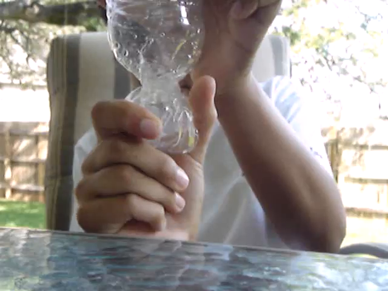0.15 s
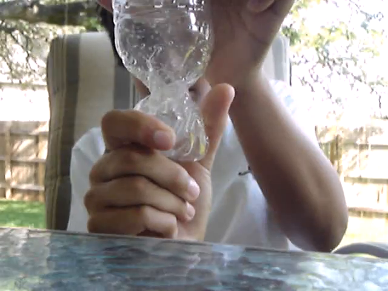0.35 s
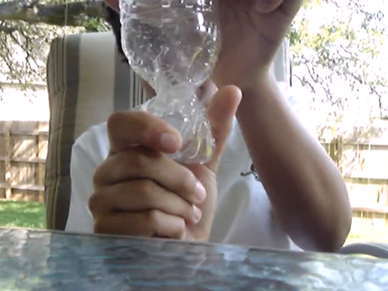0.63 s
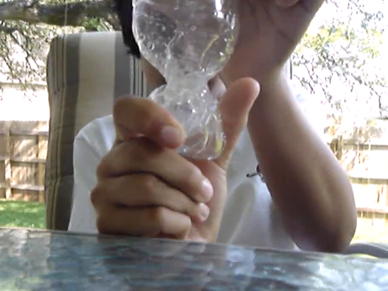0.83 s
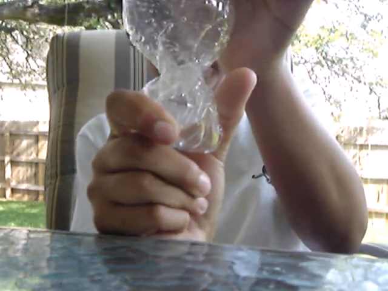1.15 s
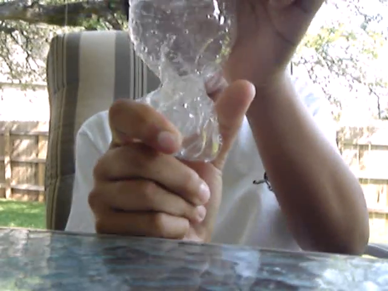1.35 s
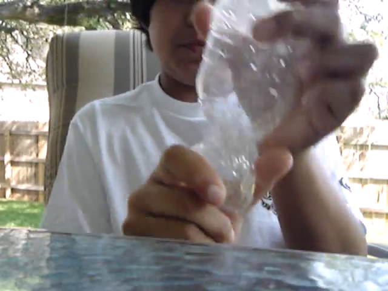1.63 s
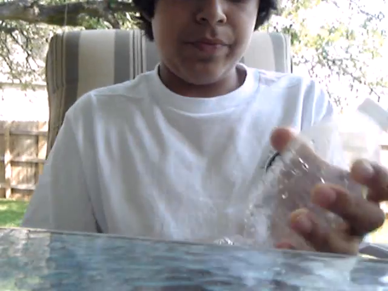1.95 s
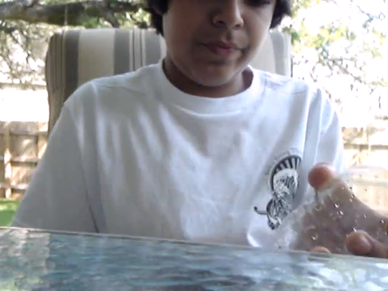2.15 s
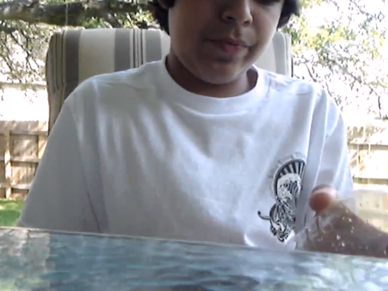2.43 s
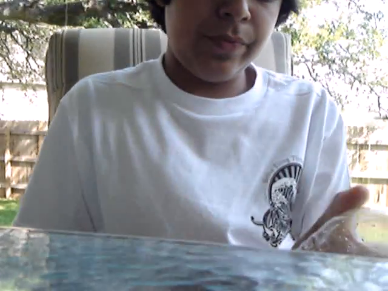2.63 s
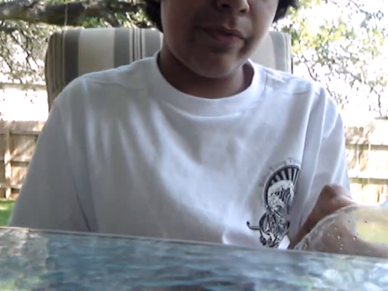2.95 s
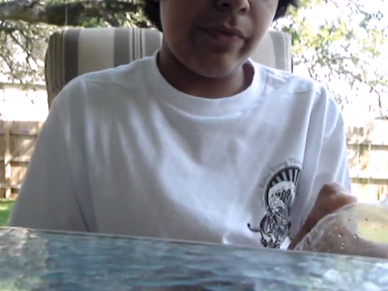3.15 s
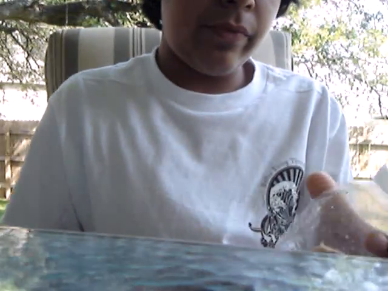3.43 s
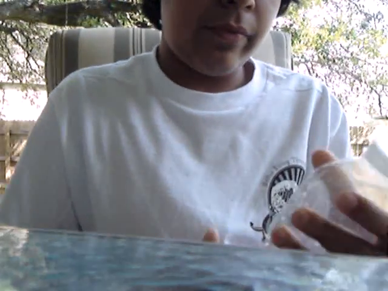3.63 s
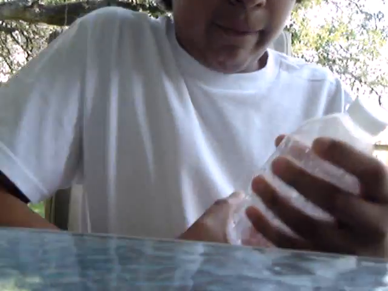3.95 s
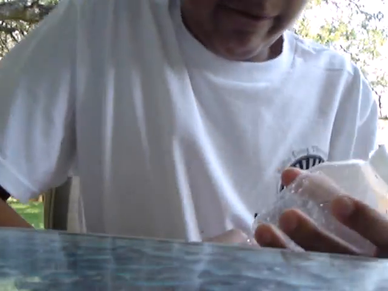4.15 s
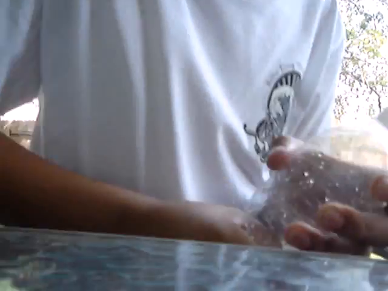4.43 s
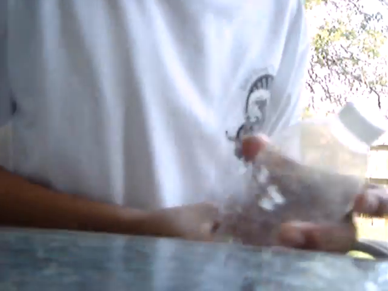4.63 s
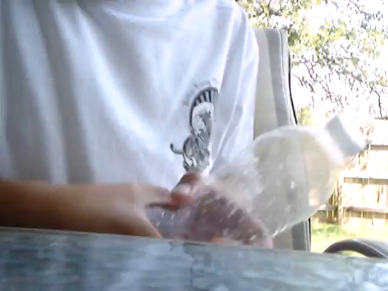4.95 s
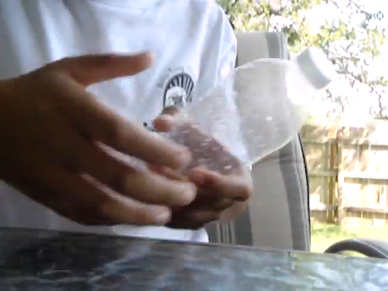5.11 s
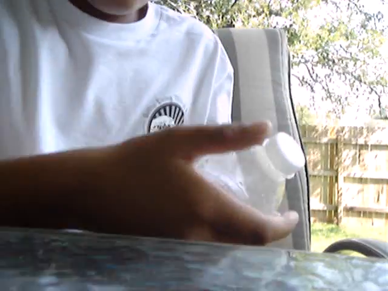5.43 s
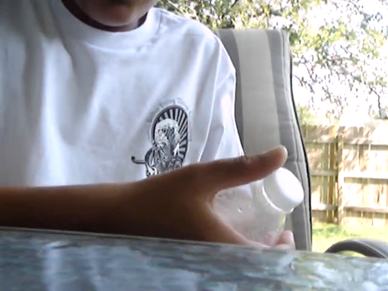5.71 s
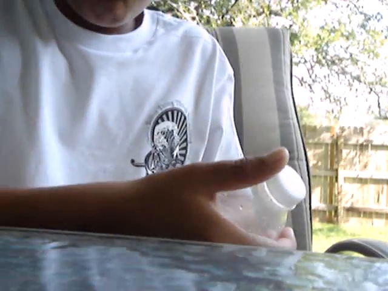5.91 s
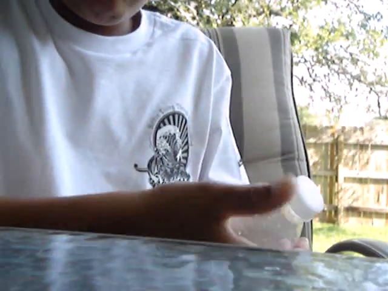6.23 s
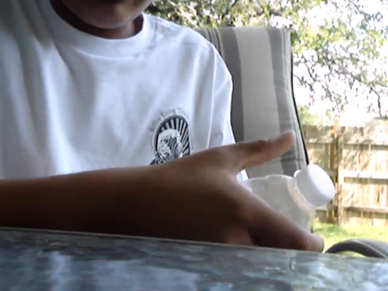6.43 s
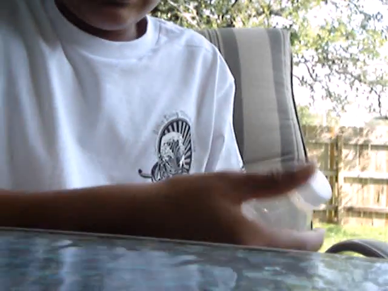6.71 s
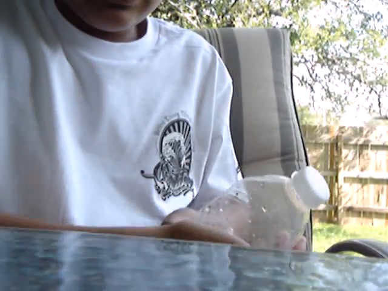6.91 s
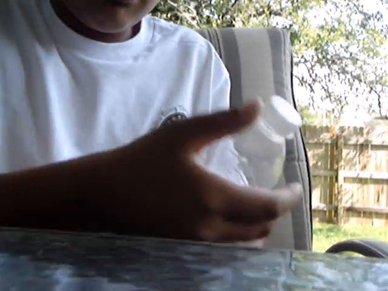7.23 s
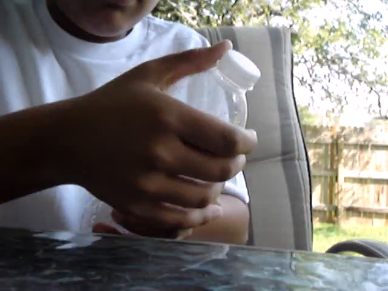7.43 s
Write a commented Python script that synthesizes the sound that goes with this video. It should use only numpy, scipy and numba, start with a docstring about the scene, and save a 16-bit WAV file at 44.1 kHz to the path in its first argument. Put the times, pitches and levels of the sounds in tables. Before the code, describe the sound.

A thin empty plastic bottle is twisted and crackles, creaks and squeaks in uneven bursts, then hands bump and thud over a fluttering outdoor drone.

```python
"""At a garden table outdoors, close to a small microphone, a thin empty plastic bottle is wrung and let unwind.
Folds in its wall snap singly and in flurries: noise cracks ringing through panel resonances.
Each turn of the wrist creaks, a stick-slip run of pulses through two panels that bend in pitch.
The hands bump and rumble: short swelling tones and patchy low noise.
Further back are outdoor air and a machine-like flutter, resonant noise beating about 22 times a second."""
import sys
import numpy as np
from scipy import signal
from scipy.fft import rfft, irfft
from scipy.io import wavfile
from scipy.ndimage import uniform_filter1d
from numba import njit

SR = 44100
rng = np.random.default_rng(int(sys.argv[2]) if len(sys.argv) > 2 else 0)


def wav_out(sig):
    """Save sig, one row per channel (or a flat mono array), as 16-bit PCM at SR to the path in sys.argv[1]."""
    wavfile.write(sys.argv[1], SR, np.round(np.clip(np.atleast_2d(sig).T, -1, 1) * 32767).astype(np.int16))


N = 333820
T = np.arange(N) / SR  # time of every sample in seconds

# Single snaps of folds, loud and faint, and the last separate ticks of a creak slowing down near 2.9 s;
# all before the patio's tail.
# Each row: time in seconds, level in dB (energy spread over about 4 ms), nominal pitch in Hz.
SNAPS = [(0.1463, -26.5, 6000), (0.1722, -31, 3480), (0.2211, -26.5, 3360), (0.2366, -26.5, 3570),
         (0.2899, -22.5, 4500), (0.303, -26, 1710), (0.353, -27, 4500), (0.3703, -26, 1670),
         (0.375, -33.5, 4500), (.385, -38.5, 2600), (0.4, -23, 3440), (0.4054, -26.5, 2080),
         (0.4245, -23, 2960), (0.4505, -20, 4500), (0.452, -13.5, 4470), (0.494, -33, 3360),
         (0.5078, -22.5, 3500), (.7863, -28, 5650), (0.7936, -27.5, 3800), (0.803, -31.5, 4700),
         (0.8112, -18, 2860), (0.8235, -30.5, 4300), (0.832, -23.5, 3080), (0.8368, -29, 3300),
         (.849, -26.5, 3700), (0.867, -26.5, 3110), (0.9343, -27, 2000), (0.959, -31, 4460),
         (1.26, -32.5, 2650), (1.284, -22.5, 5160), (1.293, -42, 3200), (1.311, -22, 1920),
         (1.315, -23.5, 3520), (1.3194, -24, 5820), (1.3305, -36.5, 3600), (1.3446, -22, 3670),
         (1.3504, -25.5, 5000), (1.357, -27, 6480), (1.389, -26.5, 2950), (1.403, -16, 2686),
         (1.4199, -30, 3520), (1.432, -39, 2500), (1.4411, -49.5, 3600), (1.4505, -26, 3600),
         (1.457, -25.5, 6200), (1.4616, -25.5, 3346), (1.4751, -24, 3140), (1.6563, -19, 2836),
         (1.6762, -24.5, 2900), (1.69, -22.5, 2650), (1.7, -21.5, 2974), (1.7066, -30.5, 3200),
         (1.7126, -27, 3280), (1.7177, -33, 3500), (1.7249, -27, 2380), (1.7322, -31.5, 3270),
         (1.7397, -23, 3100), (1.7456, -26, 3300), (1.753, -28.5, 2900), (1.7654, -28.5, 2580),
         (1.7767, -29, 2196), (1.7843, -34.5, 1800), (1.797, -33, 1490), (1.8034, -20, 2610),
         (1.8085, -29.5, 2900), (2.1189, -23.5, 2258), (2.1283, -30, 2796), (2.254, -18, 2997),
         (2.2669, -25.5, 3775), (2.281, -28.5, 4500), (2.5476, -29.5, 2396), (2.594, -35, 5531),
         (2.8605, -34.5, 5400), (2.8812, -33, 5397), (2.8973, -31.5, 5403), (2.9064, -29, 5403),
         (2.9178, -27.5, 5310), (2.9304, -29, 5200), (2.946, -25, 5092), (2.9633, -28, 5060),
         (3.029, -24, 3990), (3.1014, -27, 3823), (3.1173, -30, 4500), (3.136, -26.5, 4321),
         (3.153, -27, 4819), (3.158, -15.5, 3370), (3.193, -29.5, 4206), (3.3389, -28, 3830),
         (3.4337, -18, 2200), (3.451, -21, 3600), (3.49, -18.5, 1100), (3.5049, -18.5, 1520),
         (3.5084, -11.5, 3096), (3.5106, -16, 2599), (3.521, -16, 3020), (3.529, -29.5, 3500),
         (3.735, -41.5, 3410), (3.912, -41, 7533), (3.977, -18.5, 1960), (4.3742, -15, 3492),
         (4.3977, -22.5, 1835), (4.4248, -8, 1956), (4.4438, -15.5, 4693), (4.48, -23, 3190),
         (4.5155, -30, 2192), (4.5321, -12, 2760), (4.5469, -18, 3545), (4.612, -33, 2223),
         (4.6997, -32, 2007), (4.701, -18, 994), (4.7075, -16, 3600), (4.7218, -19.5, 4514),
         (4.725, -16, 3908), (4.7571, -10, 1104), (4.7616, -13, 2938), (4.768, -25.5, 1298),
         (4.9387, -25.5, 1600), (5.354, -31.5, 2200), (7.339, -41, 5416)]
# Flurries, quick runs of further snaps.
# Each row: start in seconds, end in seconds, typical level in dB, typical nominal pitch in Hz.
FLURRIES = [(0.462, 0.502, -27, 3600), (0.814, 0.89, -37, 2600), (1.411, 1.491, -32.5, 2810),
            (1.703, 1.753, -44, 4020), (1.764, 1.815, -26.5, 2000), (2.107, 2.24, -29.5, 2220),
            (3.44, 3.482, -30, 3600), (4.46, 4.59, -26, 3280), (4.66, 4.70, -30.5, 3400),
            (4.735, 4.80, -24.5, 3200)]
FOLDS_PER_S, FOLD_SPREAD_DB, FOLD_SPREAD_OCTAVES = 86, 1.5, 0.6
# Colour of a snapping wall. Each row: frequency in Hz, gain in dB.
WALL_COLOUR = [(150, -25.5), (450, -8), (800, 1), (1250, -2.5), (1800, 2), (2900, -5.5), (3500, -2.5),
               (4100, -4), (4700, -1), (6100, -2.5), (7000, -0.5), (10000, 3.5)]
FLIP_SAMPLE = 88  # where the sharp push falls within a crack
# A hard snap kicks the whole shell: its pitch, ring time, and share of a snap at the level SHELL_AT_DB.
SHELL_HZ, SHELL_RING_S, SHELL_DB, SHELL_AT_DB = 1997, 0.000263, -3, -10.5

# Turns of the wrist; each grip leaves a large and a small panel free to ring.
# Each row: start, hardest moment and end in seconds, swell in dB from the ends to the hardest moment,
# nominal slips per second in Hz at the start, at the hardest and at the end, body level in dB, treble level in dB
# (both at the hardest), large panel in Hz, its gain in dB, small panel in Hz, its gain in dB.
TWISTS = [(0.462, 0.486, 0.57, 8.2, 200, 500.5, 300.3, -47.5, -36, 2460, 5, 4450, -23),
          (0.782, 0.833, 0.876, 9.8, 128.5, 295.9, 128.3, -36, -49, 2300, -7.5, 3680, 20.5),
          (1.001, 1.1, 1.22, 6.8, 400, 501.4, 401.1, -62.5, -52, 2190, -0.5, 7530, 7.5),
          (1.305, 1.448, 1.53, 4.9, 100.1, 248.4, 99.97, -36, -62.5, 1614, 22.5, 3400, 5.5),
          (1.696, 1.744, 1.85, 10, 300.2, 401.2, 200.2, -28, -44, 1743, 13, 4320, 0),
          (1.979, 2.025, 2.104, 13.16, 352, 299.9, 90.7, -31, -27.5, 1972, 5, 7990, 5),
          (2.1, 2.128, 2.36, 13.37, 220.3, 321.2, 448.3, -31.5, -27, 2176, -1.5, 7600, 2.5),
          (2.348, 2.439, 2.6, 5.67, 396.9, 548.8, 445.5, -42.5, -48.5, 1239, 14, 6009, -1),
          (2.57, 2.833, 2.84, 13.48, 480, 219.4, 199.9, -33.5, -28.5, 2243, 4, 6580, 4),
          (2.834, 2.842, 2.88, 6.6, 190, 170, 99.92, -30.5, -28.5, 2244, 6, 6300, 8),
          (2.974, 3.051, 3.155, 3.1, 80.17, 109.8, 79.83, -47.5, -51, 2145, 1.5, 6107, 12.5),
          (3.165, 3.289, 3.31, 1.954, 129.9, 230.3, 270.7, -33, -26.5, 2174, -5.5, 6092, 2),
          (3.307, 3.331, 3.337, 2.173, 280, 480.5, 602.5, -30.5, -21.5, 2217, -5, 4973, -9.5),
          (3.337, 3.38, 3.385, 3.4, 1049, 1496, 1479, -25, -16, 2824, -4.5, 5003, -13),
          (3.385, 3.452, 3.495, 2.9, 351.3, 478.4, 344.9, -29.5, -24.5, 2310, 0, 4000, -28),
          (3.515, 3.528, 3.64, 23.27, 500, 759, 301.1, -20.5, -21.5, 1588, -15, 4340, -2),
          (3.982, 3.986, 4.018, 6.7, 302, 500, 298.7, -33.5, -56.5, 2387, 7.5, 2980, 11),
          (4.436, 4.479, 4.625, 5.9, 603, 751.3, 552.2, -29, -30, 2510, -5.5, 5202, -12),
          (4.592, 4.599, 4.7, 3.9, 500, 450.5, 399.4, -50.5, -44.5, 2400, 3.5, 7980, 17),
          (4.633, 4.75, 4.86, 6.8, 400, 645.4, 400.6, -32, -32.5, 1901, -18, 5521, 0),
          (4.871, 4.9, 4.997, 7, 249.7, 482, 250.2, -35, -37.5, 1947, 7.5, 8410, 11),
          (6.009, 6.059, 6.12, 8.4, 300, 453.3, 296.6, -50.5, -46, 2183, 1, 6760, 0.5),
          (6.797, 6.837, 6.87, 18.6, 150, 600, 151.8, -39, -37, 1489, -13.5, 6550, 0)]
# Colour of the rubbing contact. Each row: frequency in Hz, gain in dB.
RUB_COLOUR = [(300, -24), (850, -7), (1300, 6), (2200, 3), (2900, 1), (3600, 1), (4300, 1), (5800, 0),
              (7000, -4.5), (10000, -6)]
SLIP_JITTER_DB, SLIP_RING_S = 1.3, .002  # jitter of the slip rate at its loosest; ring time of one slip
BEND_DB_PER_DB = 0.2728  # panels rise in pitch as the force of a turn grows

# Handling bumps, heavy and light, before the microphone's low cut.
# Each row: start in seconds, peak of the swell in dB, pitch in Hz.
BUMPS = [(1.925, -26.5, 178), (2.358, -13, 253.1), (2.405, -16.5, 268.9), (2.573, -11.5, 200),
         (3.508, -23, 451), (3.727, -16, 322), (3.736, -10.5, 253), (4.195, -23.5, 171.3),
         (4.261, -20, 266), (4.397, -9.5, 253.4), (4.405, -13, 280.8), (4.478, -23, 229),
         (4.711, -14.5, 560), (4.757, -20, 549.8), (4.844, -12, 295.9), (4.937, -10.5, 253.8),
         (4.948, -7.5, 298.6), (4.956, -11, 400), (4.964, -8, 260), (4.971, -8, 270), (4.985, -6.5, 296.1),
         (5.096, -9, 326.6), (5.139, -16.5, 401), (5.161, -6.5, 321), (5.173, -12.5, 470),
         (5.189, -4.5, 386), (5.263, -6.5, 268), (5.274, -11.5, 324), (5.311, -12.5, 300),
         (5.319, -8.5, 433), (5.353, -10, 301), (5.358, -8, 293), (5.373, -3.5, 314), (5.383, -6, 403),
         (5.46, -11.5, 376), (5.656, -15.5, 242), (5.674, -14.5, 364), (6.161, -14, 260)]
# Moves of the hands and arms, before the low cut.
# Each row: peak time in seconds, time to die down by 1 / e in seconds, level at the peak in dB.
HANDS = [(1.82, 0.071, -29), (1.935, 0.02575, -41), (2.39, 0.068, -28.5), (2.5, 0.041, -31.5),
         (2.95, 0.1085, -37.5), (3.75, 0.0664, -29.5), (3.87, 0.0367, -34), (4.197, 0.019, -30),
         (4.29, 0.0403, -27), (4.41, 0.0504, -31), (4.72, 0.0826, -33), (4.95, 0.0958, -28),
         (5.35, 0.1926, -28.5), (5.72, 0.254, -32.5), (6.18, 0.098, -38.5), (7.269, 0.09, -43.5)]
HAND_RISE_SHARE = 0.965  # a move builds a little faster than it dies down
# Colour of the hands' rumble. Each row: frequency in Hz, gain in dB.
RUMBLE_COLOUR = [(30, -38.5), (70, -22.5), (130, -4), (210, 0), (350, -8.0), (550, -25.5), (900, -28.0), (3000, -57)]
# The bumps set the table shuddering. Each row: frequency in Hz, gain in dB.
SHUDDER_COLOUR = [(25, -18), (100, -17.5), (220, -4.5), (380, -0.5), (560, -0.5), (750, -23.5),
                  (1100, -36.5), (3000, -70.5)]
SHUDDER_DB, SHUDDER_S = -16, 0.0087  # level under the peak of a bump; time to swell and to die down by 1 / e

# Course of the flutter; fixed mixing gains follow in flutter().
# Each row: time in seconds, reference level in dB, hollow drone in dB over that reference.
FLUTTER = [(0, -37, 1.5), (.5, -35.5, 1.5), (1.6, -34, 1.5), (1.75, -48.5, 7.5), (2.0, -39.5, -1.5),
           (2.4, -32.5, -5.5), (3.1, -30.5, -1), (3.6, -31, -8), (3.95, -36, -6.5), (4.3, -38, -5.5),
           (4.8, -32, 2.5), (5.2, -28, -4.5), (5.7, -30.5, -0.5), (6.4, -33, 3.5), (6.52, -39, -7.5),
           (7.2, -41.5, -2.5), (7.4, -34.5, -3), (7.57, -30.5, 0)]
# Pace of the flutter. Each row: time in seconds, beats per second in Hz.
PACE = [(0, 22.15), (1, 21.95), (2, 21.9), (2.6, 22.45), (3.6, 21.85), (4.8, 21.73), (5.4, 22.25),
        (6.3, 22), (7.57, 21.9)]
# Hollow resonances of the drone. Each row: centre in Hz, width of the first filter in Hz, gain in dB.
HOLLOW = [(244.08, 4.4, 1), (372.85, 19.05, 5.5), (436.57, 8, 5), (474.3, 52, -3.5), (560, 62.5, -1)]
# Colour of the rasp. Each row: frequency in Hz, gain in dB.
RASP_COLOUR = [(400, -14), (750, -1.5), (950, -4.5), (1250, 1), (1700, -1.5), (2300, -3), (3000, -5.5),
               (4300, -9.5), (5400, -15.5), (7000, -25.5), (10000, -39)]
# Resonances of the rasp. Each row: centre in Hz, width in Hz, typical gain in dB.
RASP_MODES = [(1128.4, 19.3, 8), (1259, 27.9, 2), (1386, 61, -9), (1705, 55, -5.5), (2080, 74, -4),
              (2300, 20, 1.5), (2528, 120, -7), (3600, 43, -20), (4500, 160, -6.5)]
# Colour of the low noise under the drone. Each row: frequency in Hz, gain in dB.
UNDER_COLOUR = [(40, -39.5), (100, -0.5), (170, -4.5), (300, 3.0), (600, 0.5), (900, -11.0), (3000, -42.0)]
BEAT_DEPTH_DB, BEAT_AT_DB = 6.5, -30.5  # typical stroke over the rasp when the reference level is BEAT_AT_DB
STROKE_AT_TURN, SECOND_STROKE_S, SECOND_STROKE_DB = .76, .0095, -3
STROKE_RISE_S, STROKE_FALL_S = 0.0014, 0.00793

# Colour of the outdoor air. Each row: frequency in Hz, gain in dB.
AIR_COLOUR = [(15, -53.5), (25, -25), (118, -13.5), (148, -9.5), (257, -14.5), (307, -13), (414, -23.5),
              (447, -7.5), (719, -6.5), (775, -8.5), (857, -6), (1280, -14.5), (4600, -31), (10000, -32.5),
              (13000, -64.5), (22000, -120)]
AIR_DB = -41.5

TOP_HZ, CEILING, CLIP_TOP_HZ = 9950, .72, 15800  # microphone's top, clipping level, top after clipping
# How much of the clipping's spit gets through. Each row: frequency in Hz, gain in dB.
SPIT_COLOUR = [(9900, 0), (10600, -8)]


def snaps(max_folds=20):
    """Folds snap one by one, loud and faint; flurries are quick runs at uneven gaps, varied in strength and pitch."""
    out = np.zeros(N)
    for s, db, hz in SNAPS:
        add(out, s - FLIP_SAMPLE / SR, fold(hz, db))
    for start, end, db, hz in FLURRIES:
        for k in range(max_folds):
            s = start + (k + rng.random()) / FOLDS_PER_S
            strength, pitch = rng.standard_normal(2)
            sound = fold(hz * 2 ** (FOLD_SPREAD_OCTAVES * pitch), db + FOLD_SPREAD_DB * strength)
            if s < end:
                add(out, s, sound)
    return out


def fold(hz, db, level_samples=190):
    """One fold cracks abruptly at its own pitch: large panels low and dull, tight creases high."""
    flip = colour(crack(ring=1.5, ring_s=.0017, give_s=.0004), WALL_COLOUR)
    sound = band(flip, 0.981 * hz, 1.0 * hz)
    # the freed panel sings briefly, with an inharmonic upper mode
    upper_hz = hz * rng.uniform(1.25, 2.923)
    sound = sound + undb(-4) * band(flip, 0.704 * hz, 240)
    sound = sound + undb(-5.5) * band(flip, upper_hz, 990)
    sound = signal.lfilter(*signal.butter(2, min(1.825 * hz, SR / 3), fs=SR), sound)
    # the harder the snap, the more the whole shell joins in
    t = np.maximum(np.arange(len(sound)) - FLIP_SAMPLE, 0) / SR
    shell_hz = SHELL_HZ * undb(.8 * rng.standard_normal())
    shell = np.sin(2 * np.pi * shell_hz * t) * t * np.exp(-t / SHELL_RING_S)
    shell_db = SHELL_DB + 1.09 * (db - SHELL_AT_DB)
    sound = unit(sound) + undb(shell_db) * unit(shell)
    return undb(db) * sound / np.sqrt(np.sum(sound ** 2) / level_samples)


def crack(ring, ring_s, give_s, count=700):
    """The wall gives way, flips with one sharp push at FLIP_SAMPLE, and rings out as decaying noise."""
    t = (np.arange(count) - FLIP_SAMPLE) / SR
    tail = rng.standard_normal(count) * np.exp(-np.abs(t) / np.where(t < 0, give_s, ring_s))
    return (t == 0) + ring * tail / np.linalg.norm(tail)


def creak(order=3):
    """The slips ring the panels that each grip leaves free; the sound swells and fades with the force of the turn."""
    rub = colour(slipping(slip_rate()), RUB_COLOUR)
    # the travelling crease has a restless resonance of its own
    rub = rub + undb(-5) * sweep(rub, 3000 * undb(1.44 * walk(40)), 1400.0)
    tension = undb(0.22 * walk(18))  # changing tension bends the panels' pitch
    low, high = (signal.butter(order, 3800, kind, fs=SR, output="sos") for kind in ("low", "high"))
    out = np.zeros(N)
    for (start, hardest, end, swell_db, _, _, _, body_db, treble_db,
         large_hz, large_db, small_hz, small_db) in TWISTS:
        # each end fades over 3.8 ms
        grip = np.clip(np.minimum(T - start, end - T) / 0.0038 + .5, 0, 1)
        on = grip > 0
        push = force(start, hardest, end, swell_db)[on]
        x = rub[on]
        bend = tension[on] * push ** BEND_DB_PER_DB
        x = x + undb(large_db) * sweep(x, large_hz * bend, 130.0) + undb(small_db) * sweep(x, small_hz * bend, 880.0)
        body = unit(signal.sosfilt(low, x))
        treble = unit(signal.sosfilt(high, x))
        out[on] += np.sqrt(grip[on]) * push * (undb(body_db) * body + undb(treble_db) * treble)
    return out


def slip_rate():
    """Through each turn the slips speed up or run down with the wrist: separate ticks when slow, a squeak when fast."""
    slip_hz = np.full(N, 100.)
    for start, hardest, end, _, start_hz, hardest_hz, end_hz, *_ in TWISTS:
        on = (T > start) & (T < end)
        times = [start, np.clip(hardest, start, end), end]
        slip_hz[on] = np.exp(np.interp(T[on], times, np.log([start_hz, hardest_hz, end_hz])))
    return slip_hz


def force(start, hardest, end, swell_db):
    """The force of one turn swells evenly in dB to 1 and falls back."""
    return undb(np.interp(T, [start, np.clip(hardest, start, end), end], [-swell_db, 0, -swell_db]))


def slipping(slip_hz, patches=4):
    """Slow slips are a run of separate ticks, faster ones a scrape; the fastest grow regular, a cleaner squeak."""
    speed = np.clip(slip_hz / 1300, 0, 1)
    loose = 1 - .68 * speed ** 2  # irregularity
    turns = np.cumsum(slip_hz * undb(SLIP_JITTER_DB * loose * walk(300))) / SR
    slips = np.flatnonzero(np.diff(np.floor(turns)))
    size = undb(1.86 * (loose * noise())[slips]) / np.sqrt(slip_hz[slips])
    # the contact stays on one patch for several slips, then jumps to another
    jump_chance = np.minimum(.5, 130 * np.sqrt(loose[slips]) / slip_hz[slips])
    patch = np.cumsum(rng.random(len(slips)) < jump_chance) % patches
    rub = 0
    for k in range(patches):
        pulses = np.zeros(N)
        pulses[slips] = size * (patch == k)
        rub = rub + signal.oaconvolve(pulses, crack(ring=2.7, ring_s=SLIP_RING_S, give_s=0.00085))[:N]
    scrape = undb(-6) * np.sqrt(speed * loose) * noise()
    return (unit(rub) + scrape) * undb(1.255 * walk(110))


@njit
def sweep(x, hz, width):
    """A resonance whose centre moves every sample: a two-state filter with gain 1 at its centre."""
    y, b, low = np.empty(len(x)), 0., 0.
    for i in range(len(x)):
        g, k = np.tan(np.pi * min(hz[i], .4 * SR) / SR), width / hz[i]
        v = (b + g * (x[i] - low)) / (1 + g * (g + k))
        b, low, y[i] = 2 * v - b, low + 2 * g * v, k * v
    return y


def patio(x, wet_db, t60_s):
    """Table top and house wall return a short, faint tail of decaying noise."""
    t = T[:SR // 3]
    tail = band(rng.standard_normal(len(t)), 1300, 1400) * 1000 ** (-t / t60_s) * (t > .006)
    return x + undb(wet_db) * signal.fftconvolve(x, tail / np.linalg.norm(tail))[:N]


def handling():
    """Bumps swell and die in a few milliseconds amid a brief shudder; each move of the hands raises a patchy rumble."""
    out = np.zeros(N)
    t = T[:SR // 20]
    age = t / 0.000999
    swell = age ** 2 * np.exp(-age)
    for s, db, hz in BUMPS:
        thud = swell / swell.max() * np.sin(2 * np.pi * hz * t + rng.uniform(0, 2 * np.pi))
        add(out, s, undb(db) * thud)
    moves = [undb(db) * np.exp(-np.maximum((s - T) / HAND_RISE_SHARE, T - s) / fall_s) for s, fall_s, db in HANDS]
    rumble = colour(noise(), RUMBLE_COLOUR)
    # overlapping moves, and overlapping shudders, add in power
    out += unit(rumble * undb(2.39 * walk(55))) * np.linalg.norm(moves, axis=0)
    shaking = np.sqrt(sum(undb(db) ** 2 * np.exp(-2 * np.minimum(np.abs(T - s) / SHUDDER_S, 20))
                          for s, db, _ in BUMPS))
    out += undb(SHUDDER_DB) * shaking * unit(colour(noise(), SHUDDER_COLOUR))
    # the small microphone loses the deepest part
    return signal.sosfilt(signal.butter(3, 80, "high", fs=SR, output="sos"), out)


def flutter():
    """A ringing rasp beats with a sharp double stroke about 22 times a second; a hollow drone throbs with it."""
    level_db, drone_db = curves(FLUTTER)
    pace, = curves(PACE)
    turns = np.cumsum(pace) / SR
    age = (turns - STROKE_AT_TURN) % 1 / pace  # seconds since the last first stroke
    # strokes stand out more as the flutter grows
    depth = undb(BEAT_DEPTH_DB + 2.36 * (level_db - BEAT_AT_DB))
    rasp = colour(noise(), RASP_COLOUR)
    # the shares of the resonances wander, at about the pace of the beats
    modes = sum(undb(db + 3.66 * walk(22)) * band(rasp, hz, width) for hz, width, db in RASP_MODES)
    rasp = unit(rasp + modes)
    beat = stroke(age) + undb(SECOND_STROKE_DB) * stroke(age - SECOND_STROKE_S)
    beat = beat * undb(1.75 * walk(60))  # uneven strokes
    # deeper beats are scaled down, to hold back the overall level
    rasp *= (1 + depth * beat) / (1 + 0.2114 * depth) * undb(1.05 * walk(110))
    drone = unit(sum(undb(db) * band(band(noise(), hz, width), hz, 3 * width) for hz, width, db in HOLLOW))
    under = unit(colour(noise(), UNDER_COLOUR))
    throb = undb(2.49 * np.sqrt(depth) * np.cos(2 * np.pi * turns))
    hollow = undb(drone_db - 3.0) * drone + undb(-6.0) * under
    return undb(level_db) * (undb(-8.0) * rasp + throb * hollow)


def stroke(age):
    """One stroke of the flutter starts abruptly and dies away."""
    return np.clip(age / STROKE_RISE_S, 0, 1) * np.exp(-np.maximum(age, 0) / STROKE_FALL_S)


def air():
    """Steady outdoor hiss, coloured noise that wavers slightly in level."""
    return undb(AIR_DB + 1.1 * walk(4.92)) * unit(colour(noise(), AIR_COLOUR))


def undb(db):
    """Decibels to gain."""
    return 10 ** (np.asarray(db) / 20)


def unit(x):
    """Scale to rms 1."""
    return x / np.sqrt(np.mean(x ** 2))


def curves(table):
    """The columns of a table of (seconds, ..) rows at every sample."""
    s, *columns = np.transpose(table)
    return [np.interp(T, s, c) for c in columns]


def add(out, s, sound):
    """Mix a short sound in at time s."""
    i = max(int(s * SR), 0)
    out[i:i + len(sound)] += sound[:N - i]


def band(x, hz, width_hz):
    """One resonance, gain 1 at its centre."""
    hz = min(hz, .4 * SR)
    return signal.lfilter(*signal.iirpeak(hz, hz / min(width_hz, SR / 3), fs=SR), x)


def colour(x, spectrum, size=2048):
    """Causal minimum-phase filter through (Hz, dB) points."""
    hz, db = np.transpose(spectrum)
    gain = undb(np.interp(np.log(np.arange(size // 2 + 1) * SR / size + 1), np.log(hz), db))
    cepstrum = irfft(np.log(gain))[:size // 2]
    cepstrum[1:] *= 2
    return signal.oaconvolve(x, irfft(np.exp(rfft(cepstrum, size))))[:len(x)]


def noise():
    """White noise for the whole scene."""
    return rng.standard_normal(N)


def walk(rate):
    """Random levels, rate new ones a second, joined by slopes; rms 1."""
    k = int(SR / rate)
    return unit(uniform_filter1d(np.repeat(rng.standard_normal(N // k + 1), k), k)[:N])


def scene():
    """Bottle, hands and background at one microphone."""
    bottle = patio(snaps() + creak(), wet_db=-23.0, t60_s=0.099)
    return (bottle + handling() + flutter() + air())[None]


def record(dry):
    """The microphone passes little above 10 kHz; the highest peaks then clip, which spits a little higher treble."""
    narrow = signal.sosfilt(signal.ellip(10, .2, 62, TOP_HZ, fs=SR, output="sos"), dry)
    clipped = colour(np.clip(narrow[0], -CEILING, CEILING), SPIT_COLOUR)[None]
    return signal.sosfilt(signal.butter(14, CLIP_TOP_HZ, fs=SR, output="sos"), clipped)


dry = scene()
out = record(dry)
wav_out(out)
```